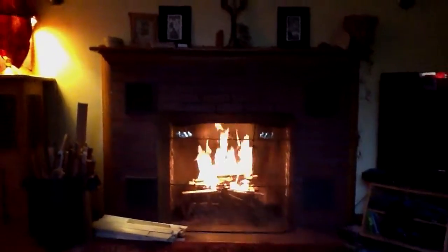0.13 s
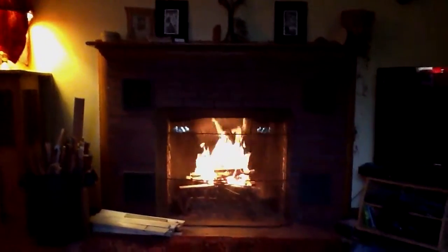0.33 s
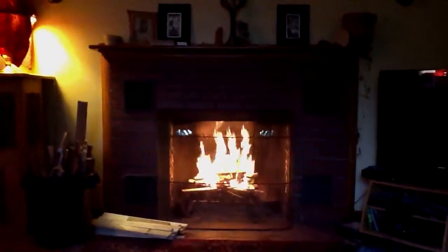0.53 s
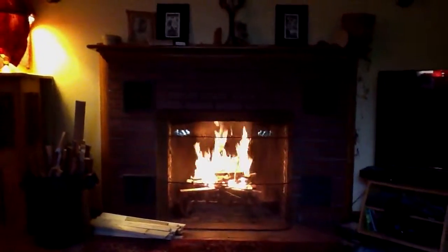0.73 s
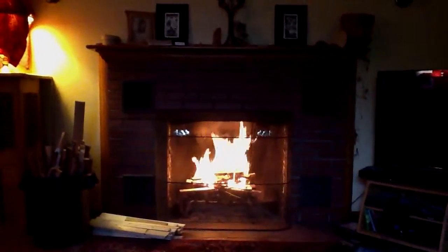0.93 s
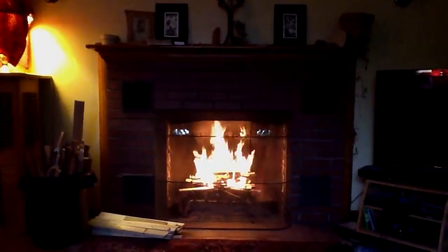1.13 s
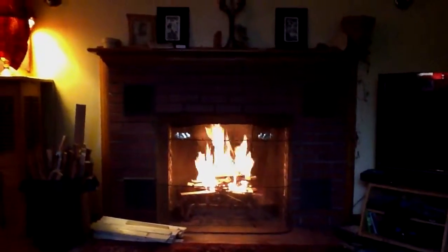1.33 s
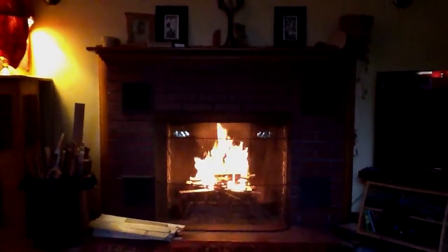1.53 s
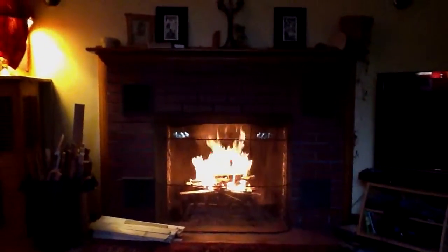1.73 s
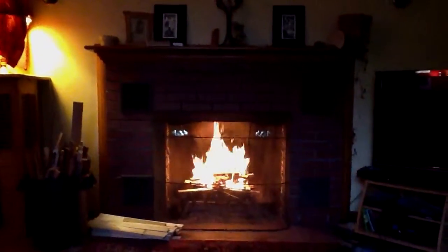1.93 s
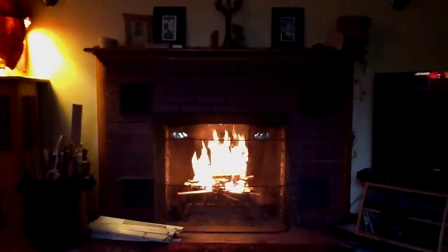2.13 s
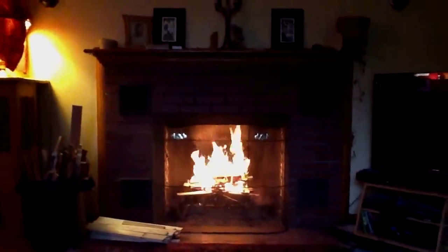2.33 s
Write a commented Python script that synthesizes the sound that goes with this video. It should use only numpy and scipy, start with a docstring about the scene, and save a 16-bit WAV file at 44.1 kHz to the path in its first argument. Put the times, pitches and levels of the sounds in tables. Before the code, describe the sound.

Burning wood crackling in a living room fireplace, with a few sharp, loud pops.

```python
"""A low flutter of flames and a thin sizzle of gas, then a loud pop: a log fire in a brick fireplace,
heard from one microphone a few metres away in a quiet living room. Pockets of gas burst in the wood,
three loud pops and some small crackles, each a woody knock with a bright snap, thrown back by the
firebox and the room. The flames flutter in the low resonances of the hearth, over a faint even hiss."""
import sys
import numpy as np
from scipy import signal
from scipy.fft import rfft, irfft, next_fast_len
from scipy.io import wavfile
from scipy.ndimage import map_coordinates

SR = 44100
rng = np.random.default_rng(int(sys.argv[2]) if len(sys.argv) > 2 else 0)


def digitize_waveform(pressure):
    """Quantize a signal to 16-bit integers and store it at the path in sys.argv[1].

    Rows of a 2-D input are taken as channels; values are limited to [-1, 1].
    """
    field = np.atleast_2d(pressure).T
    bounded = np.clip(field, -1, 1)
    quanta = np.round(bounded * 32767).astype(np.int16)
    wavfile.write(sys.argv[1], SR, quanta)


N = 110250

# The hiss behind the fire. Each row: frequency in Hz, relative level in dB.
HISS_SPECTRUM = [(20, -34), (100, -6.5), (600, -0.5), (1000, -3.5), (1700, -0.5), (2300, 1), (2900, 3),
                 (3700, 0), (5000, -2), (7000, -1.5), (9000, -1), (12000, -3), (15300, -4.5)]
# The hearth's low resonances. Each row: frequency in Hz, relative level in dB.
HEARTH_SPECTRUM = [(15, -55), (30, -39), (45, -43), (64, -32), (78, -17.5), (95, -18), (122, -5.5),
                   (146, -13), (168, 3), (195, -3), (215, -4), (245, -13), (295, -8.5), (348, -26.5),
                   (396, -10), (440, -22.5), (650, -22), (1100, -27.5), (3000, -51)]
# Puffs of gas favour the deepest resonances. Each row: frequency in Hz, gain in dB.
PUFF_TILT = [(50, -6), (120, -0.5), (210, 0.5), (300, -3.5), (600, -13.5)]
# Flares of the flames. Each row: time of the peak in seconds, level in dB.
FLAME_FLARES = [(.015, -64), (0.151, -56.5), (.39, -56), (0.427, -57.5), (.455, -60.5), (0.518, -58),
                (.68, -63), (.78, -58.5), (0.829, -60.5), (0.909, -55), (.955, -58), (1.05, -59.5),
                (1.18, -65), (1.342, -56.5), (1.449, -60), (1.611, -68), (1.70, -59), (1.81, -59),
                (1.866, -57.5), (1.93, -62), (2.06, -57.5), (2.17, -61)]
# Gas escaping from the log. Each row: frequency in Hz, relative level in dB.
JET_SPECTRUM = [(100, -30), (700, -4), (1200, -7), (1800, -4), (2300, 0), (2650, -4), (2900, 5), (3200, -6),
                (4500, -18), (15000, -30)]
# Reflections off firebox, floor and ceiling. Each row: delay in seconds, level in dB,
# smear as t60 in seconds.
REFLECTIONS = [(.0018, -4.5, .002), (.0036, -2, 0.0015), (0.0105, -3, 0.006), (.026, -8, 0.056)]
# The firebox's ringing. Each row: frequency in Hz, relative level in dB, t60 in seconds.
FIREBOX_MODES = [(940, 0.5, 0.2), (1103, -10, 0.22), (1261, -6.5, 0.32), (1494, 2.5, 0.19),
                 (1690, 2.5, 0.14), (1850, -7, 0.17), (2064, 0, 0.16), (2280, -3, 0.22), (2364, 4.5, 0.11),
                 (2574, -6.5, 0.35), (2754, -10, 0.26), (2817, -2.5, 0.2)]
# The living room's decay. Each row: frequency in Hz, t60 in seconds.
ROOM_DECAY = [(200, 0.69), (1000, 0.32), (2600, .33), (3500, .29), (6000, 0.3), (12000, 0.25),
              (16000, 0.44)]
# A woody knock pitched at KNOCK_HZ. Each row: frequency in Hz, gain in dB.
KNOCK_SPECTRUM = [(20, -49), (100, -28.5), (300, -19.5), (540, -23), (760, -13), (1100, -12.5), (1600, -7),
                  (2100, -4), (2550, -2.5), (3200, -5.5), (4200, -12), (5000, -24), (9000, -41)]
# The snap of splitting fibres. Each row: frequency in Hz, gain in dB.
SNAP_SPECTRUM = [(20, -55), (100, -73), (520, -27.5), (850, -8.5), (3000, -1), (5000, -4), (6200, 1),
                 (7400, -3), (9200, 2.5), (10700, -7.5), (12600, -4), (14000, -15), (15500, -18)]
# The snap's treble beams straight at the microphone. Each row: frequency in Hz, gain in dB.
SNAP_BEAM = [(1000, -2), (5000, -23), (8000, -4), (10000, -0.5), (12500, 1.5), (15000, -3)]
# Bursts in the wood. Each row: start in seconds, knock in dB, its pitch in Hz, its width as a ratio,
# splinter's ring in Hz, snap in dB, extra gain of the direct snap in dB, thump in dB.
GAS_BURSTS = [(0.1925, -11, 2700, 1.2, 2800, -26, 4, -27), (0.2064, 8.5, 2700, 0.82, 2850, -7.5, -4, 4),
              (0.209, 6.5, 2800, 0.87, 2360, -9.5, -11, 4.5), (0.26, -16, 2700, 0.55, 2820, -25, -3, -26),
              (.2722, -17, 2600, 1.2, 2460, -31, 0, -35), (.4530, -24.5, 2570, .9, 2570, -39, -5, -40),
              (.5899, -24, 2700, 0.64, 2800, -35, 0, -42), (0.7863, -22, 2750, 1, 2330, -36, -7, -38),
              (1.0480, -23.5, 2180, 1.3, 2940, -36, 0, -40), (1.1030, -28, 2600, 0.73, 2970, -32.5, 0, -40),
              (1.2230, -13.5, 3050, .85, 3250, -32, -21, -42), (1.598, -25, 3020, 0.49, 3000, -37, -4, -45),
              (1.7409, -11, 2780, 1.2, 2990, -27, -4, -27), (1.7717, -16, 2620, 0.85, 2140, -31, -5, -27),
              (1.7731, -22, 2820, 1.2, 3200, -22.5, 7, -32), (1.8222, -15.5, 2380, 1.25, 2180, -29, 0, -34),
              (1.9081, -22, 2300, 1.45, 2210, -32.5, 2, -37), (2.0455, 3, 2250, 1, 3400, 0, 10, -13.5),
              (2.1496, -9.5, 3380, 0.76, 2900, -25, -6, -5), (2.1881, 10.5, 2280, 1.1, 3240, -16, 4.5, 6),
              (2.3367, -15.5, 3200, 1.13, 2820, -26, -18, -35)]

KNOCK_HZ = 2500


def amp(db):
    """Decibels to gain."""
    return 10 ** (np.asarray(db) / 20)


def unit_rms(x):
    """Scale to rms 1."""
    return x / np.sqrt(np.mean(x ** 2) + 1e-20)


def unit_energy(x):
    """Scale to energy 1."""
    return x / np.sqrt(np.sum(x ** 2) + 1e-20)


def along(points, hz):
    """Read (Hz, value) points on a log axis."""
    freqs, values = np.transpose(points)
    return np.interp(np.log(hz + 1), np.log(freqs + 1), values)


def add(track, start_s, sound):
    """Mix a sound into the track."""
    part = track[max(0, round(start_s * SR)):][:len(sound)]
    part += sound[:len(part)]


def noise(spectrum):
    """Coloured noise of rms 1."""
    gain = amp(along(spectrum, np.fft.rfftfreq(N, 1 / SR)))
    return unit_rms(irfft(rfft(rng.standard_normal(N)) * gain, N))


def fading_noise(t, t60_s):
    """Noise of energy 1 that falls 60 dB in t60_s."""
    return unit_energy(rng.standard_normal(len(t)) * amp(-60 * t / t60_s))


def wobble(rate_hz):
    """A smooth random curve, rate_hz knots a second."""
    return map_coordinates(rng.standard_normal(N // 100), [np.arange(N) * rate_hz / SR])


def click(gain):
    """The shortest causal pulse with these gains, evenly spaced from 0 Hz to SR / 2."""
    cepstrum = irfft(np.log(gain + 1e-6))
    half = len(cepstrum) // 2
    cepstrum[1:half] *= 2
    cepstrum[half + 1:] = 0
    return irfft(np.exp(rfft(cepstrum)))


def hiss(level_db=-63.5):
    """A faint, even hiss behind everything."""
    return amp(level_db) * noise(HISS_SPECTRUM)


def puff_gain(size):
    """How the hearth resonates to a puff of gas, over the bins of an FFT of this size."""
    hz = np.fft.rfftfreq(size, 1 / SR)
    return amp(along(HEARTH_SPECTRUM, hz) + along(PUFF_TILT, hz))


def flames(level_db=-64.5, flutter_db=1.5, flare_sigma_s=.01):
    """Flames drive the hearth's low resonances: a flutter, and a deep puff with each flare."""
    t = np.arange(N) / SR
    flares = sum(amp(db) * np.exp(-.5 * ((t - s) / flare_sigma_s) ** 2) for s, db in FLAME_FLARES)
    rumble = unit_rms(irfft(rfft(rng.standard_normal(N)) * puff_gain(N), N))
    flutter = amp(level_db + flutter_db * wobble(rate_hz=14))
    return flutter * noise(HEARTH_SPECTRUM) + flares * rumble


def gas_jet(start_s=.123, end_s=.205, edge_s=.003, level_db=-61):
    """Gas sizzles out of the log, faintly whistling, just before the first loud pop."""
    t = np.arange(N) / SR
    gate = (np.tanh((t - start_s) / edge_s) - np.tanh((t - end_s) / edge_s)) / 2
    return amp(level_db) * gate * noise(JET_SPECTRUM)


def echoes(room_delay_s=.02, room_rise_s=.0033):
    """What firebox and room throw back to the microphone from one spot in the fire."""
    n = SR // 3
    t = np.arange(n) / SR
    walls = np.zeros(n)
    for delay_s, db, smear_s in REFLECTIONS:
        add(walls, delay_s, amp(db) * fading_noise(t, smear_s))
    firebox = unit_energy(sum(amp(db - 60 * t / t60) * np.sin(2 * np.pi * (hz * t + rng.random()))
                              for hz, db, t60 in FIREBOX_MODES))
    # each band of the room's tail dies at its own rate
    hz, when, bands = signal.stft(rng.standard_normal(n), SR, nperseg=256)
    decay = amp(-60 * when / along(ROOM_DECAY, hz)[:, None])
    tail = signal.istft(bands * decay, SR, nperseg=256)[1][:n]
    room = unit_energy(tail * (1 + np.tanh((t - room_delay_s) / room_rise_s)))
    brick_scatter = fading_noise(t, t60_s=.1)
    return walls + amp(5.5) * brick_scatter + amp(-5.5) * firebox + amp(3.5) * room


def burst(knock_db, pitch_hz, width, ring_hz, snap_db, direct_db):
    """Wood splits: a knock, a ringing splinter and a snap reach the microphone, then their echoes."""
    hz = np.fft.rfftfreq(2048, 1 / SR)
    body = amp(along(KNOCK_SPECTRUM, KNOCK_HZ * (hz / pitch_hz) ** (1 / max(width, .5))))
    splinter = amp(-1.5) / (1 + ((hz - ring_hz) / 102) ** 2)  # half-width 102 Hz
    knock = amp(knock_db) * np.hypot(body, splinter)
    snap = amp(snap_db + along(SNAP_SPECTRUM, hz))
    beamed_snap = snap * amp(direct_db + along(SNAP_BEAM, hz))
    direct = click(np.hypot(knock, beamed_snap))
    response = echoes()
    out = signal.fftconvolve(click(np.hypot(knock, snap)), response)
    add(out, 0, direct)
    add(out, .0004, amp(-1.5) * direct)  # the fibres give way in two quick steps
    return out / np.sqrt(1 + np.sum(response ** 2))


def embers(count=14, weakest_db=-32, spread_db=6):
    """The embers give tiny crackles at random moments."""
    out = np.zeros(N)
    for moment, size, pitch in rng.random((count, 3)):
        db = weakest_db + spread_db * size
        hz = KNOCK_HZ * (1 + .3 * pitch)
        add(out, moment * N / SR, burst(db, hz, width=.7, ring_hz=hz, snap_db=db - 17, direct_db=0))
    return out


def pops():
    """Each pocket of gas cracks the wood, and its puff thumps the hearth."""
    out = np.zeros(N)
    t = np.arange(SR // 2) / SR
    hearth = click(puff_gain(8192))
    for start_s, knock_db, pitch_hz, width, ring_hz, snap_db, direct_db, thump_db in GAS_BURSTS:
        add(out, start_s, burst(knock_db, pitch_hz, width, ring_hz, snap_db, direct_db))
        puff = fading_noise(t, t60_s=.22)
        add(out, start_s, amp(thump_db) * signal.fftconvolve(hearth, puff))
    return out


def scene():
    """The fire from a few metres away, in mono, over a steady hiss."""
    return (pops() + gas_jet() + embers() + flames() + hiss())[None]


def record(dry):
    """The recorder keeps nothing above its band limit."""
    top_hz = 15450
    size = next_fast_len(N + SR // 2)
    passband = np.fft.rfftfreq(size, 1 / SR) < top_hz
    return irfft(rfft(dry, size) * passband, size)[..., :N]


dry = scene()
out = record(dry)
digitize_waveform(out)
```